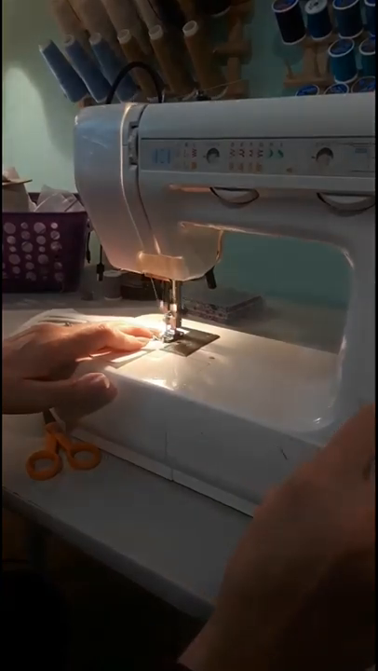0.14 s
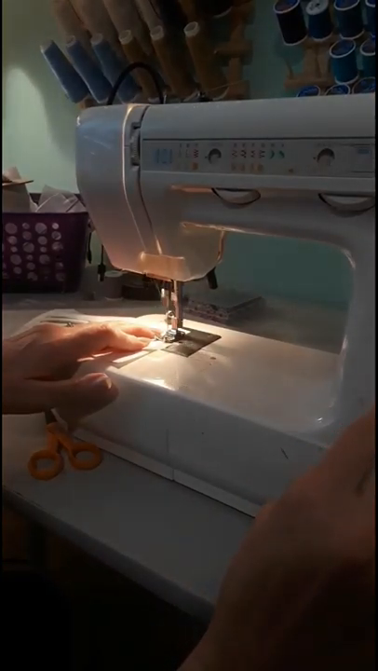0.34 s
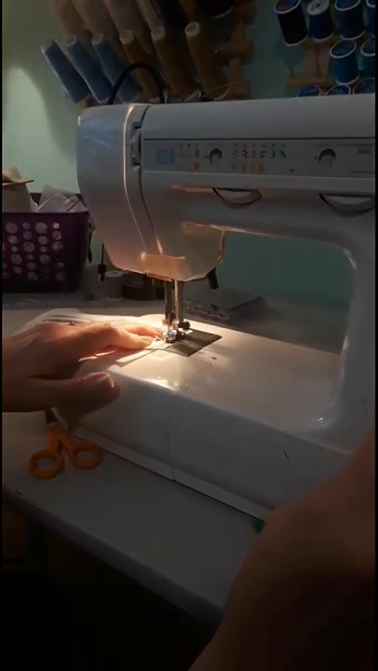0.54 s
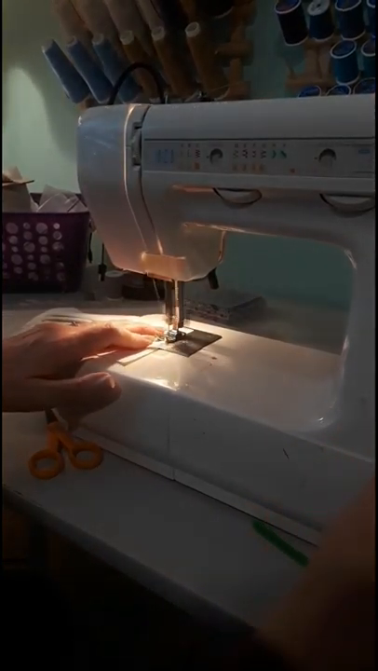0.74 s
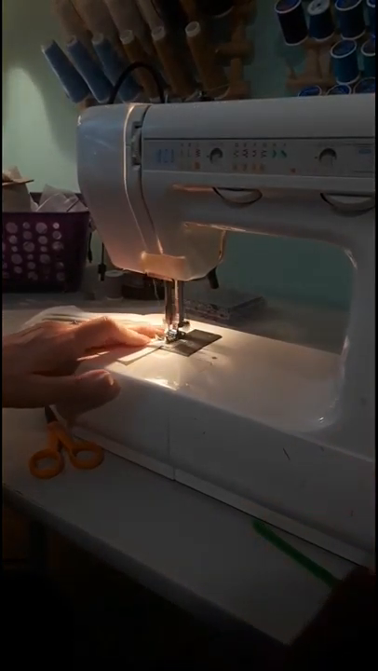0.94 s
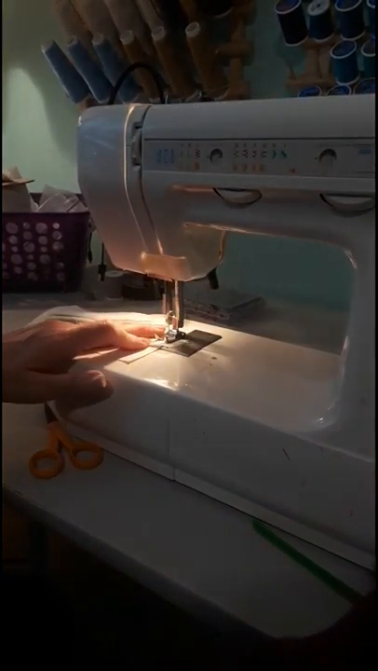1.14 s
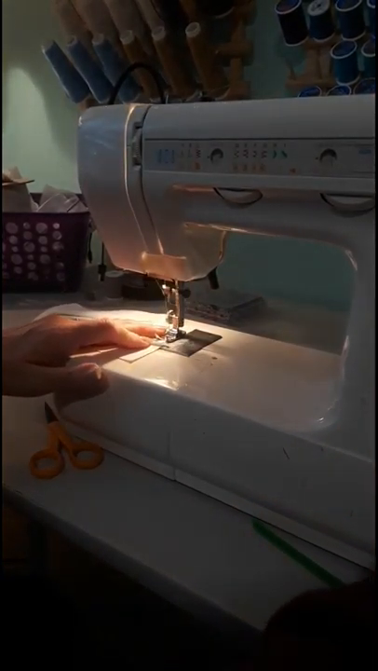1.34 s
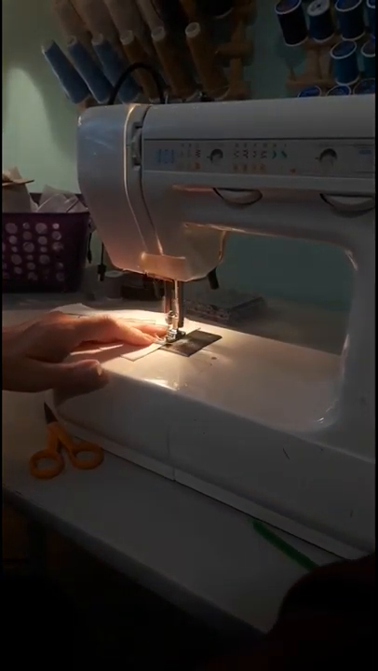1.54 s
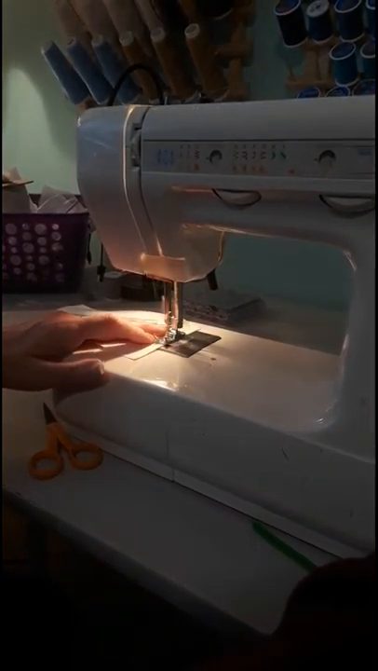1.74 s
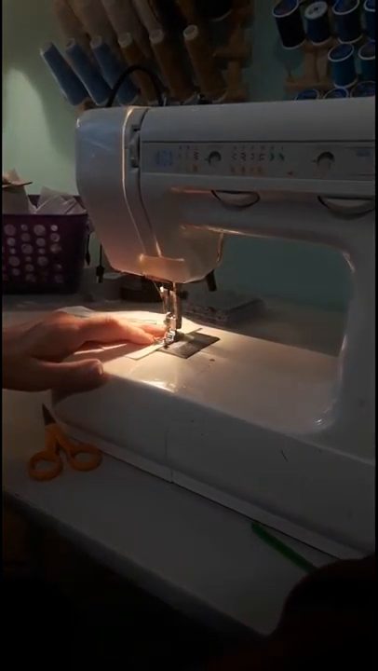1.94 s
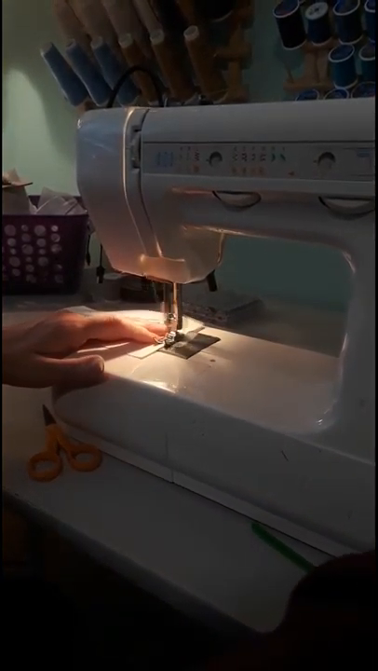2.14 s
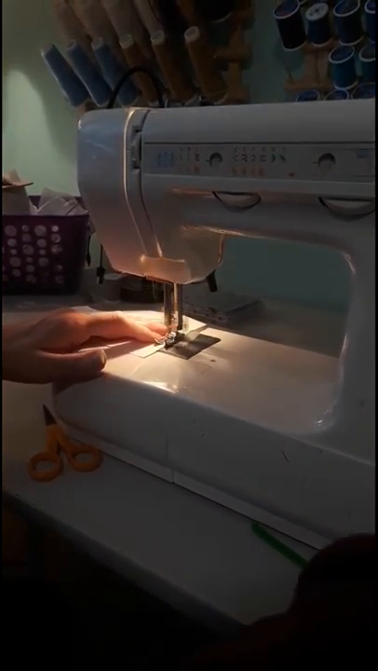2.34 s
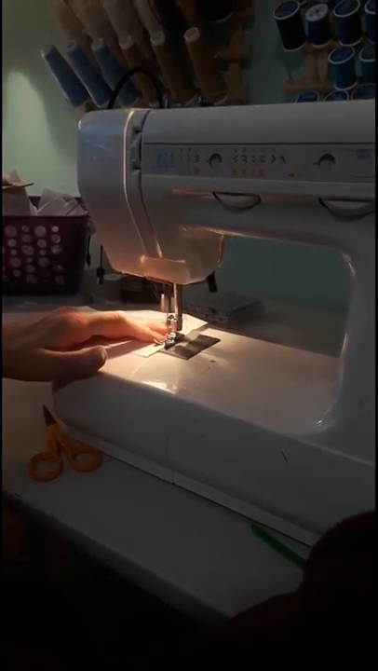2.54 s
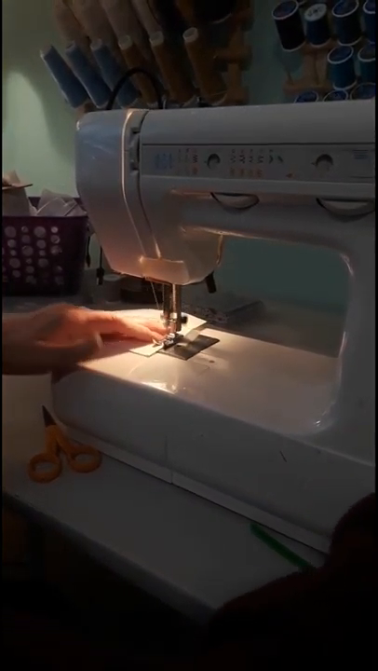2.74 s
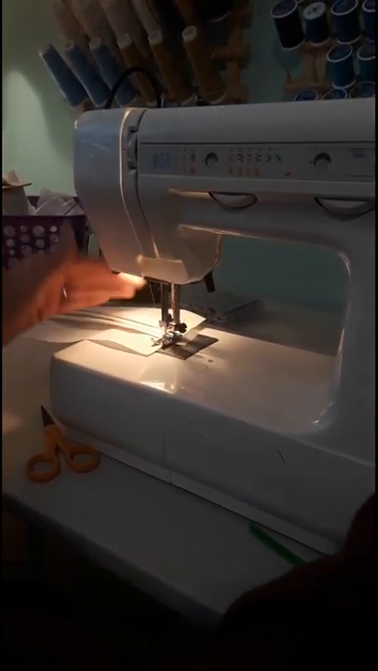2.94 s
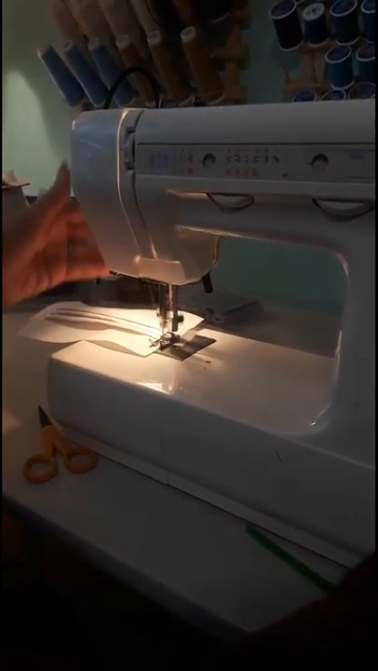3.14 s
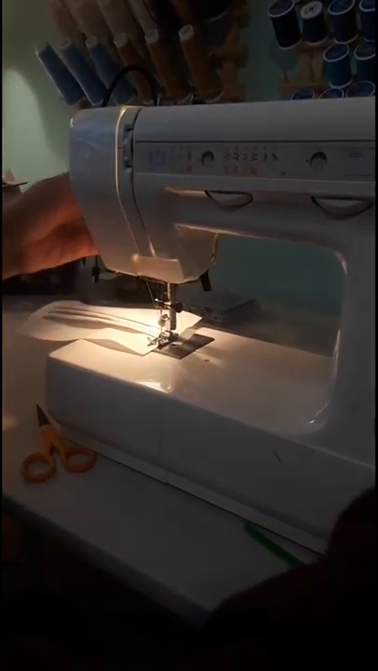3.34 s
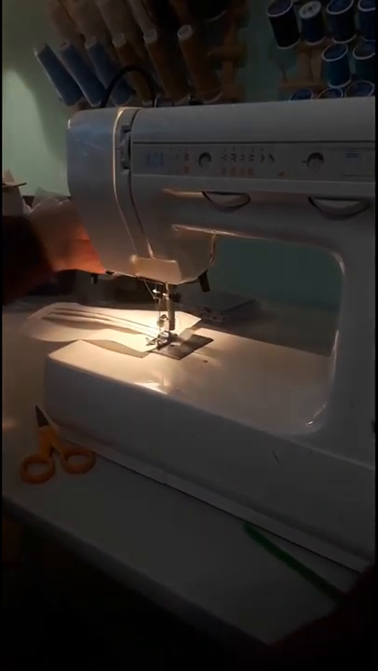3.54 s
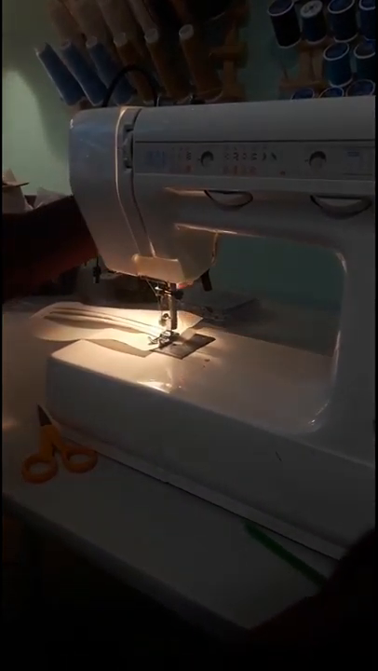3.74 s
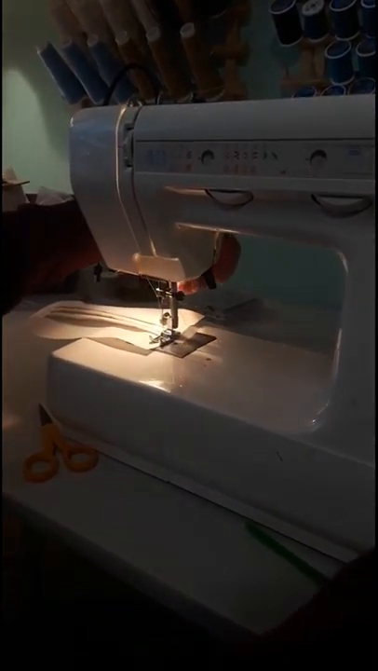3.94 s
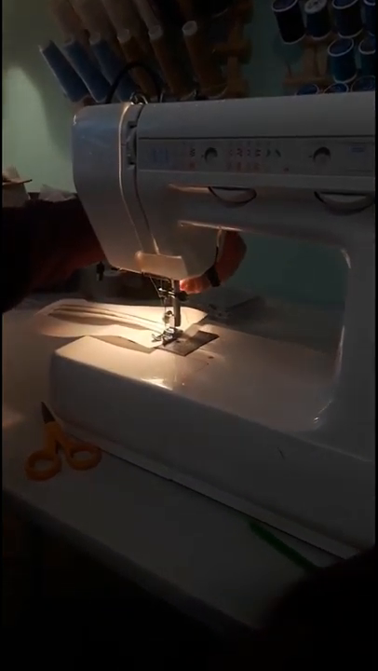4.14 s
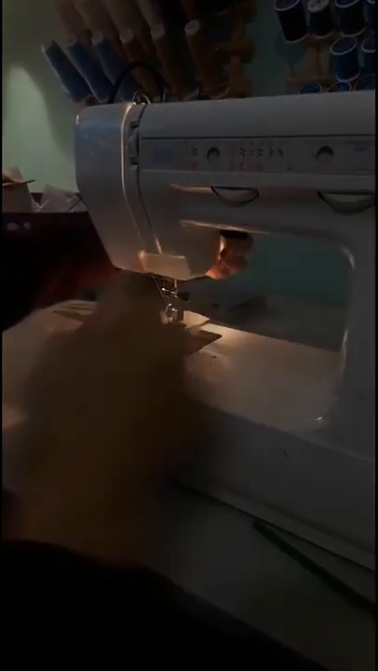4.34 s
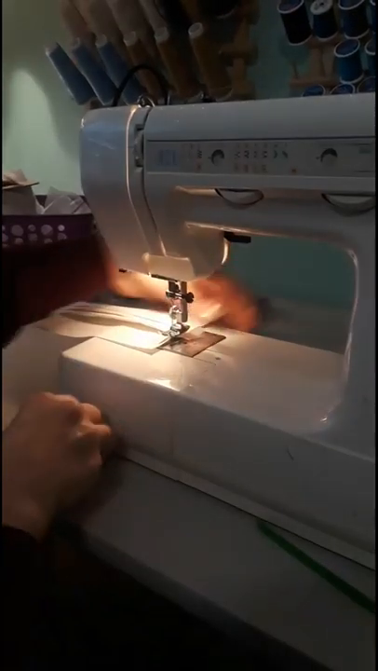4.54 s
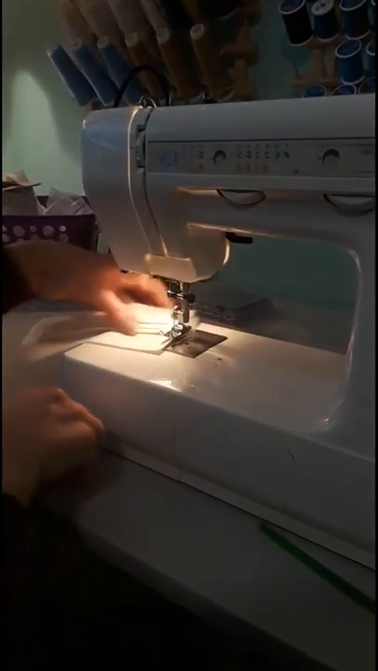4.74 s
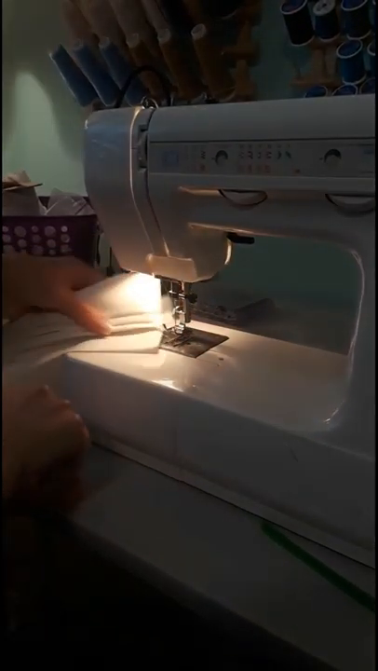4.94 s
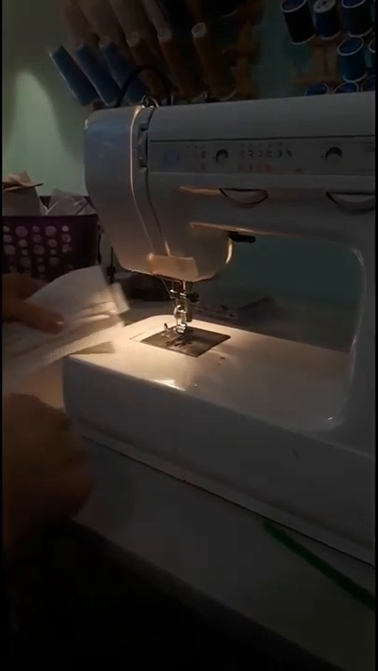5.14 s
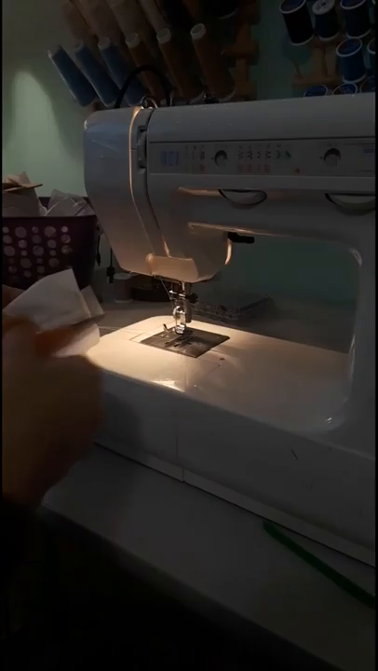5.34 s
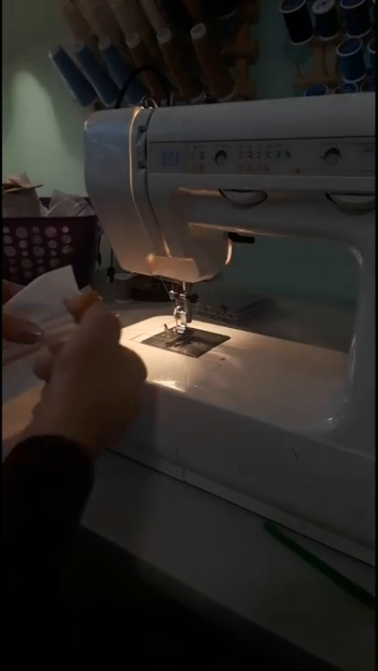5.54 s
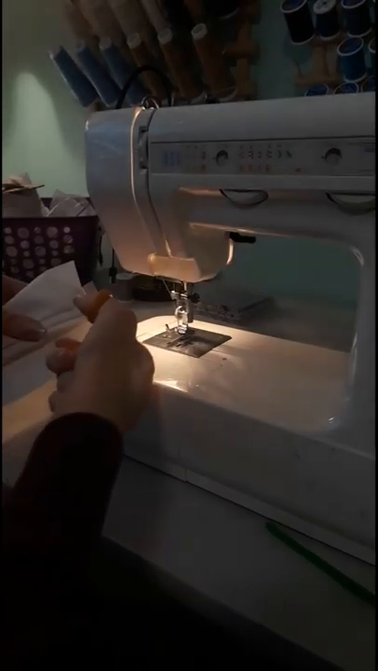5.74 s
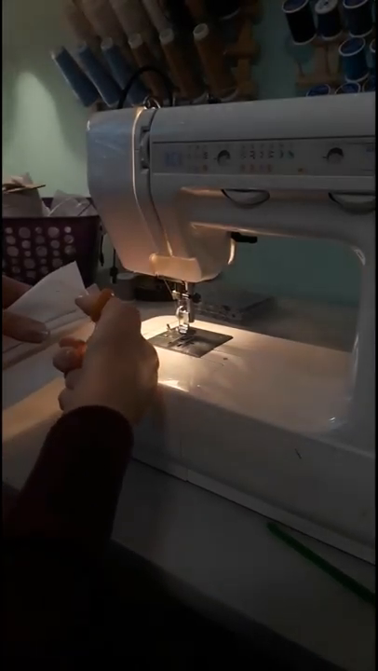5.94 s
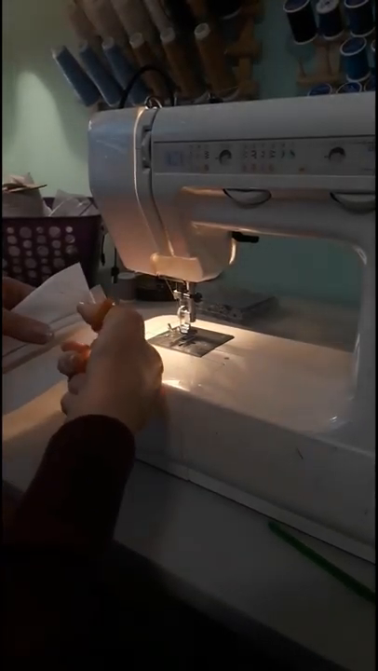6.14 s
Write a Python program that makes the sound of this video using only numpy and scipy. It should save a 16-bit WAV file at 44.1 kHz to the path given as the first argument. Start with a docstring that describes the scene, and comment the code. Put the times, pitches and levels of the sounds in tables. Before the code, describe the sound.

A close stereo pickup of an electric sewing machine indoors: slow first stitches quicken into a steady metallic chatter over a wavering motor whirr and fine hiss, then drag to a stop. Afterwards come scattered plastic and metal clicks, a hard snap that booms in the hollow case, soft hand brushing, and short gritty fabric slides, ending in faint steady room noise with a thin whine.

```python
"""A hand brushes the bed, then a sewing machine speeds up, sews a short seam and stops, in a small room.
While it runs the drive rattles and hisses, needle bar and feed clack in turn, and the hollow case thumps.
Then a hand works the levers, the presser foot snaps up, and the cloth is drawn away over a dull hum of air.
Rattle, rub and air are filtered noise, clacks and snaps are noise bursts, thumps are decaying sine modes."""
import sys
import numpy as np
from scipy import signal
from scipy.fft import rfft, irfft, next_fast_len
from scipy.io import wavfile

SR = 44100
rng = np.random.default_rng(int(sys.argv[2]) if len(sys.argv) > 2 else 0)


def unload_wav(signal):
    """Save mono or channel-first audio to the path in sys.argv[1] as 16-bit WAV at rate SR, clipped to [-1, 1]."""
    wavfile.write(
        sys.argv[1],
        SR,
        np.round(np.clip(np.atleast_2d(signal).T, -1, 1) * 32767).astype(np.int16),
    )


N = 272971
TIME = np.arange(N) / SR
HZ = np.fft.rfftfreq(8192, 1 / SR)  # frequency grid on which filters are drawn

# spectra of the drive's layers, shape only: f/Hz, level/dB
DRONE_SPECTRUM = [(40, -48), (75, -20), (120, -15), (190, -7), (260, -3.5), (330, 0.5), (380, 2.5),
                  (470, -3.5), (600, -11), (900, -47.5)]
RATTLE_SPECTRUM = [(250, -26), (450, -31), (600, 1), (900, -8.5), (1300, -5.5), (1800, -8), (2600, -14),
                   (3500, -27.5), (5000, -43), (9000, -46.5)]
HISS_SPECTRUM = [(2350, -10.5), (4000, 2), (5070, -5), (5570, -2.5), (8120, -3.5), (9770, -11.5),
                 (12600, -2), (14800, -13), (15500, -8), (16000, -6)]
# resonances of the frame: f/Hz, width f/Hz, level/dB above the spectrum
FRAME_MODES = [(122.6, 30.6, 11.5), (230.4, 32, 7.5), (262.6, 28, 10), (337, 12, 8), (360.4, 27, 7),
               (419.3, 19.6, 9.5), (539.4, 51, 10.5), (600, 35, 0), (693, 42, -1), (775, 75, 10.5),
               (986, 56, 5), (1026, 68, 3.5), (1085, 50, 11.5), (1270, 13, 5), (1434, 77, 7)]
# resonances of the steel parts: f/Hz, width f/Hz, level/dB above the spectrum
STEEL_MODES = [(2500, 120, 1), (2706, 100, 4), (3210, 380, 7.5), (3740, 60, 7), (3910, 49, 4.5),
               (4394, 56, 8), (4430, 91, 2.5), (4640, 37, 10), (4900, 86, 2.5), (5110, 70, 8),
               (5230, 60, 4)]
RATTLE_DB, DRONE_DB, HISS_DB = -35, -35, -48.5  # at full effort, before the load surges
DRONE_FOLLOWS, HISS_FOLLOWS = 0.74, 0.87  # dB gained per dB of effort
WHIRR_DB, WHIRR_HZ = -39.5, 386.1  # a wavering tone in the drone
WHIRR_WAVER, WAVER_S = 0.18, 0.07  # largest share the pitch strays, time per glide
THREAD_TAUT_S = 0.14  # the hiss comes in as the thread tightens


def drive():
    """Gears and links rattle in the frame, the case drones with a wavering tone, and thread and hook hiss."""
    effort = effort_gain()
    load = surge()
    drone = effort ** DRONE_FOLLOWS
    hiss = effort ** HISS_FOLLOWS * np.minimum(TIME / THREAD_TAUT_S, 1) ** 2

    low = colour(grains(per_s=200, spread_db=1.5, smooth_db=-0.5) * drone, DRONE_SPECTRUM, FRAME_MODES)
    mid = grains(per_s=320, spread_db=3, smooth_db=-0.5) * effort * load
    mid = colour(mid, RATTLE_SPECTRUM, FRAME_MODES + STEEL_MODES)
    top = colour(grains(per_s=320, spread_db=7.5, smooth_db=0.5) * hiss * load, HISS_SPECTRUM, STEEL_MODES)

    stray = np.interp(TIME / WAVER_S, np.arange(N), rng.uniform(-0.94, 1, N))
    pitch = WHIRR_HZ * (1 + WHIRR_WAVER * stray)
    whirr = grains(per_s=250, spread_db=4.5, smooth_db=-3.5) * drone
    whirr = resonate(resonate(whirr, pitch, width=27), pitch, width=31)
    whirr *= np.std(drone) / np.std(whirr)
    return gain_of(WHIRR_DB) * whirr + gain_of(DRONE_DB) * low + gain_of(RATTLE_DB) * mid + gain_of(HISS_DB) * top


# how hard the motor works: t/s, level/dB
EFFORT = [(0.0, -18), (0.1, -10), (0.19, -15.5), (0.26, -17.5), (0.37, -4.5), (0.5, -9), (0.78, -4.5),
          (1.11, 0), (1.39, -0.5), (2.2, -0.5), (2.58, -5), (2.74, -15), (2.86, -31)]


def effort_db(s):
    """Effort of the motor in dB at time s."""
    return np.interp(s, *np.transpose(EFFORT))


def effort_gain():
    """Effort of the motor as a gain curve, dying away after the last row of its table."""
    s = np.transpose(EFFORT)[0]
    outside = np.maximum(s[0] - TIME, 0) + np.maximum(TIME - s[-1], 0)
    return gain_of(effort_db(TIME)) * np.exp(-outside / 0.084)


# turning of the main shaft, hesitant at first, then even: t/s, stitches sewn [turns]
SHAFT_TURNS = [(0.171, 0), (0.372, 1), (0.53, 2), (0.628, 2.47), (0.7145, 3), (0.843, 3.47), (0.961, 4),
               (1.118, 5), (1.272, 6), (2.172, 12), (2.485, 14), (2.652, 15), (2.748, 15.5)]
# load on the links through one turn: place in the turn [0-1], level/dB
TURN_LOAD = [(0, 3), (0.2, 1.5), (0.4, 2.5), (0.45, -1), (0.56, 1.5), (0.72, 0), (0.86, -2), (1, 2)]


def surge():
    """Gain of rattle and hiss as the load changes through each turn of the shaft."""
    turns = np.interp(TIME, *np.transpose(SHAFT_TURNS))
    return gain_of(np.interp(turns % 1, *np.transpose(TURN_LOAD)))


# contacts in every stitch (needle bar twice, hook, feed four times, take-up lever), before trims:
# place in the turn [0-1], steel ring level/dB, fine tick level/dB, clatter level/dB, decay t/s
STITCH_CONTACTS = [(0, -29.5, -45, -30, 0.0065), (0.058, -30, -40, -32, 0.0059),
                   (0.226, -40, -54, -35.5, 0.0069), (0.45, -46, -51, -37, 0.011),
                   (0.485, -32, -46, -29.5, 0.0077), (0.549, -41.5, -56, -30, 0.0051),
                   (0.61, -40, -60, -35, 0.0049), (0.945, -36.5, -53, -41.5, 0.0051)]
# spectra of ring, tick and clatter, shape only: f/Hz, level/dB
RING_SPECTRUM = [(1200, -19), (2500, 12.5), (3300, 9.5), (4800, 10.5), (6000, 7), (8000, -1), (10000, -17),
                 (16000, -38)]
TICK_SPECTRUM = [(5000, -19), (8000, -1.5), (10000, 0.5), (12800, 3), (15000, 0.5), (16000, -5)]
CLATTER_SPECTRUM = [(300, -48), (650, 10), (1000, -2.5), (1900, 4.5), (2600, -3), (3500, -16),
                    (6000, -60.5)]
# how hard the needle bar lands, one row per stitch: steel ring level/dB, fine tick level/dB
NEEDLE_ACCENTS = [(-5, -1), (-7, -3), (0, 4.5), (-0.5, -2.5), (2, 3), (1.5, 1), (2, 3), (2.5, 0.5),
                  (-2, 0.5), (-2.5, 0.5), (-3, -1), (-6, -0.5), (-4, -0.5), (1, 1.5), (-2, -6), (0.5, -5)]
RING_FOLLOWS = 0.54  # the steel rings less at low effort: extra dB per dB of stroke
PART_DETUNE, PART_SCATTER_DB = .02, 4.5  # the steel rings a little differently from stroke to stroke


def clacks(count=4):
    """Once a stitch, needle bar and feed take up their slack, chatter and ring the steel."""
    rows = []
    for place, ring, tick, clatter, decay in STITCH_CONTACTS:
        for s, db in zip(*strokes(place)):
            rows.append((s, ring + db * (1 + RING_FOLLOWS), tick + db, clatter + db, decay))
    accents = np.zeros((len(rows), 5))
    # the needle bar's two contacts come first
    accents[:2 * len(NEEDLE_ACCENTS), 1:3] = np.tile(NEEDLE_ACCENTS, (2, 1))
    s, ring_db, tick_db, clatter_db, decay_s = np.transpose(rows + accents)

    # strokes fall at random into groups, each with its own tuning of the steel
    ring, way = 0, rng.integers(0, count, len(s))
    for k in range(count):
        steel = []
        for f, w, db in STEEL_MODES:
            detuned = f * (1 + PART_DETUNE * rng.uniform(-0.63, 1))
            steel.append((detuned, w, db + PART_SCATTER_DB * rng.standard_normal()))
        # every group takes its decays from the top of the list, so they are mostly the needle bar's
        hits = chatter(s[way == k], ring_db[way == k], decay_s, hit_s=0.0018)
        ring = ring + colour(hits, RING_SPECTRUM, steel)
    tick = colour(chatter(s, tick_db, decay_s, hit_s=0.0033), TICK_SPECTRUM)
    clatter = chatter(s, clatter_db, decay_s, hit_s=0.0036)
    clatter = colour(clatter, CLATTER_SPECTRUM, FRAME_MODES + STEEL_MODES)
    return gain_of(-8.5) * ring + gain_of(-4.0) * tick + gain_of(-2.5) * clatter


STROKE_FOLLOWS, STROKE_SCATTER_DB = 0.5, 1.85  # dB per dB of effort, random spread


def strokes(place):
    """When the shaft passes a place in its turn, and how strong (dB) each stroke is."""
    s, turns = np.transpose(SHAFT_TURNS)
    passes = np.arange(len(NEEDLE_ACCENTS)) + place
    times = np.interp(passes, turns, s)
    dbs = STROKE_FOLLOWS * effort_db(times) + STROKE_SCATTER_DB * rng.standard_normal(len(times))
    reached = passes <= turns[-1]
    return times[reached], dbs[reached]


CHATTER_GAP_S, CHATTER_SCATTER_DB = .003, 2.5  # a loose joint closes in a quick run of hits


def chatter(times, dbs, decays, hit_s, count=6):
    """Each contact is a run of separate sharp noise hits, dying away."""
    hits = np.zeros(N)
    gaps = rng.uniform(0.46, 1.5, (len(times), count))
    sizes = rng.standard_normal((len(times), count))
    for s, db, decay_s, gap, size in zip(times, dbs, decays, gaps, sizes):
        after = CHATTER_GAP_S * (np.cumsum(gap) - gap[0])
        share = (gain_of(CHATTER_SCATTER_DB * size) * np.exp(-after / decay_s)) ** 2
        energy = gain_of(db) ** 2 * decay_s / hit_s
        hits[np.round((s + after) * SR).astype(int)] += energy * share / share.sum()
    power = signal.lfilter([1], [1, -np.exp(-2 / (hit_s * SR))], hits + 1e-20)
    return paired(rng.standard_normal((2, N))) * np.sqrt(2 * power)


# modes of the hollow case, before each blow weights them: f/Hz, level/dB, time to fall 60 dB t/s
CASE_MODES = [(139.7, -21, 0.2), (229.7, -21.5, 0.36), (347, -7.5, 0.068), (365, -7, 0.11),
              (401.7, -19.5, 0.27), (443.7, 1.5, 0.054), (506, -15, .035), (547, -10.5, 0.049),
              (614, -4, 0.026), (775, -17, 0.092), (940, -7.5, 0.027), (988, -25.5, 0.11),
              (1053, -10.5, 0.023), (1145, -29, 0.046), (1440, -25, 0.056), (1925, -36, 0.069),
              (2300, -31, .07)]


def knocks():
    """The case booms in decaying modes; hard blows wake its upper modes, heavy blows the lowest."""
    t, out = np.arange(SR // 4) / SR, np.zeros(N)
    hz, db, t60 = np.transpose(CASE_MODES)[:, :, None]
    sign = np.where(hz < 400, -1, 1)  # the two main modes start opposed, so the boom swells and beats
    onset = 1 - np.exp(-t / 0.0031)
    modes = sign * gain_of(db - 60 * t / t60) * np.sin(2 * np.pi * hz * t) * onset
    upper, lower = np.clip((hz - 450) / 150, 0, 1), np.clip((380 - hz) / 120, 0, 1)
    # a blow's lean favours one main mode or the other
    higher = np.clip((hz - 405) / 40, -1, 1) * (abs(hz - 405) < 100)
    for s, blow_db, hard_db, weight_db, lean_db in blows():
        wake_db = upper * (hard_db + 14.0) + lower * (weight_db + 15.5) + higher * lean_db
        add(out, s, gain_of(blow_db) * (modes * gain_of(wake_db)).sum(0))
    # the boom carries little deep bass below 100 Hz
    return gain_of(-4.5) * signal.sosfilt(signal.butter(2, 100, "high", fs=SR, output="sos"), out)


# the links knock the case in every turn, before stroke strength:
# place in the turn [0-1], level/dB, hardness level/dB, weight level/dB, lean level/dB
LINK_KNOCKS = [(0.239, -33.5, -3, -21, -1.5), (0.71, -28, -2.5, -21, -3), (0.9, -36.5, 4, -27, 6.5)]
# dull blows, from the labouring machine or the hand: t/s, level/dB, hardness level/dB,
# weight level/dB, lean to the higher main mode level/dB, time to the rebound t/s
DULL_BLOWS = [(0.222, -32, -9, -28, 3, .010), (0.274, -30, -32, -16, 0, .010),
              (0.371, -22.5, -13, -19, -8, .0105), (0.411, -23.5, -20, -30, -6.5, .011),
              (0.676, -21, -13.5, -11, -7, .010), (0.717, -25, -16, -19, 6, .010),
              (0.745, -29.5, -11, -34, -10, .0105), (0.82, -29, -13, -30, 9, .009),
              (0.8976, -15, -16, -31, 4, .0102), (0.988, -25.5, -15, -28, -2, .011),
              (1.094, -24.5, -15, -22, -5.5, .011), (1.223, -14, -20, -38, -2, .010),
              (1.417, -19, -12, -14.5, 0, .010), (1.757, -23.5, -19, -16, -8, .010),
              (2.067, -26, -21, -25, 3, .010), (2.309, -27, -21, -22, -7.5, .011),
              (2.368, -25.5, -12, -22, -6, .011), (2.447, -20.5, -9, -33, -6, .010),
              (2.491, -26, -9, -24, 0.5, .011), (2.539, -25, -11, -28, 5, .0095),
              (2.585, -22.5, -22, -21, 0.5, 0.0106), (2.642, -32, -21, -13, -9.5, .010),
              (2.958, -33, -19, -22, -2, .010), (3.093, -26, -12, -27, 1, 0.014),
              (3.142, -36, -13, -24, -5, 0.0052), (4.064, -41, -5.5, -8, 7.5, .010),
              (4.3615, -29, -2, -6, -3.5, .0105), (4.582, -40, 0, -1, -6.5, 0.0097),
              (4.785, -40.5, -9, 3.5, -2, 0.0098), (4.919, -38.5, 0.5, -10, -7.5, 0.014)]
REBOUND_DB = 1  # each dull blow lands twice
CLICK_HARD_DB, CLICK_WEIGHT_DB, CLICK_LEAN_DB = 1, -31.5, 2  # hardness where clatter equals boom
BOOM_LAG_S = 0.001


def blows():
    """All that strikes the case: s, dB, hardness, weight, lean. A snap with more clatter is a harder blow."""
    struck = []
    for place, knock, *tone in LINK_KNOCKS:
        struck += [(s, knock + db, *tone) for s, db in zip(*strokes(place))]
    for s, db, *tone, rebound_s in DULL_BLOWS:
        struck += [(s, db, *tone), (s + rebound_s, db + REBOUND_DB, *tone)]
    for s, _, _, clatter, boom in LEVER_SNAPS:
        hard = CLICK_HARD_DB + (clatter - boom) / 2
        struck.append((s + BOOM_LAG_S, boom, hard, CLICK_WEIGHT_DB, CLICK_LEAN_DB))
    return struck


# levers, presser foot and thread snapping, before trims:
# t/s, steel ring level/dB, fine tick level/dB, clatter level/dB, boom of the case level/dB
LEVER_SNAPS = [(0.193, -60, -61, -47, -42), (0.266, -54, -62, -51, -58), (0.334, -46, -46, -33.5, -50),
               (0.39, -40, -50, -39, -42), (0.564, -43, -51, -36.5, -40), (2.179, -46, -53, -48, -48),
               (2.503, -38, -41, -25.5, -43), (2.611, -48, -52, -27.5, -26), (2.695, -40.5, -52, -30, -37),
               (2.866, -53.5, -70, -43, -23), (3.174, -48, -52, -57, -62), (3.184, -54, -52, -39, -35),
               (3.2054, -35, -42.5, -28.5, -22.5), (3.2132, -52, -52, -29.5, -36),
               (3.228, -50, -60, -45, -30), (3.2832, -64, -67, -42, -54), (3.363, -50, -58, -43, -30.5),
               (3.518, -51, -65, -47, -55), (3.527, -53, -55, -41, -38), (3.5323, -44.5, -47, -35, -41),
               (3.543, -50, -55, -41, -45), (3.57, -55, -61, -46, -38), (3.613, -44.5, -48, -35, -29),
               (3.717, -63, -61, -49, -53), (3.7853, -36, -51, -31, -6), (3.861, -56, -61, -44, -34),
               (3.891, -46.5, -48, -40.5, -47), (4.021, -57, -75, -43, -36), (4.037, -54, -71, -44.5, -50),
               (4.362, -64, -70, -45, -24.5), (4.374, -60, -62, -46, -35), (4.704, -53, -48, -42, -40),
               (4.9572, -45, -44, -43, -51), (4.9755, -39.5, -50, -34.5, -33.5),
               (5.446, -63, -59, -66, -59)]
# bright spectrum of a snap, shape only: f/Hz, level/dB
SNAP_SPECTRUM = [(1200, 4.5), (2300, 3), (3300, 1), (4600, 5.5), (6200, 0), (8000, -3), (10000, -25),
                 (16000, -34)]
# resonances of the plastic head that carries the levers: f/Hz, width f/Hz, level/dB above the spectrum
HEAD_MODES = [(944, 60, 6), (1133, 62, 7), (1605, 50, 5.5), (1910, 34, -0.5), (2315, 53, 1)]


def clicks():
    """Small levers snap against the plastic head in bouncing bursts of noise."""
    s, ring_db, tick_db, clatter_db, _ = np.transpose(LEVER_SNAPS)
    ring = colour(bursts(s, ring_db, decay_s=0.005, bounce_s=0.009, bounce_db=-12.0), SNAP_SPECTRUM)
    tick = colour(bursts(s, tick_db, decay_s=0.0047, bounce_s=0.0063, bounce_db=-23), TICK_SPECTRUM)
    clatter = bursts(s, clatter_db, decay_s=0.0056, bounce_s=.0075, bounce_db=-5)
    clatter = colour(clatter, CLATTER_SPECTRUM, HEAD_MODES)
    # paired trims are left and right
    return gain_of([[1.5], [0.1]]) * ring + gain_of([[0.1], [-1.8]]) * tick + gain_of(0.2) * clatter


def bursts(times, dbs, decay_s, bounce_s, bounce_db):
    """Each contact chatters briefly, and the part bounces once."""
    t, power = np.arange(SR // 8) / SR, np.zeros(N)
    for s, db, late in zip(times, dbs, rng.uniform(0.96, 1.3, len(times))):
        shape = (gain_of(db) * np.exp(-t / decay_s)) ** 2
        add(power, s, shape)
        add(power, s + bounce_s * late, shape * gain_of(bounce_db) ** 2)
    return grains(per_s=4900, spread_db=-1.0, smooth_db=-14) * np.sqrt(power)


# spectra of the cloth's layers, shape only: f/Hz, level/dB
SLIP_SPECTRUM = [(40, -47), (120, -10), (230, 15.5), (450, 3.5), (620, 1), (850, -17), (1400, -15.5)]
RUB_SPECTRUM = [(300, -22.5), (560, 8.5), (720, 0), (840, 4), (1000, -2.5), (1650, -2.5), (2400, -10),
                (2750, -5.5), (3100, -17), (4500, -20), (8000, -31.5)]
CLOTH_HISS_SPECTRUM = [(1760, -3.5), (3000, -4), (4410, -8.5), (5600, -13), (7940, -6.5), (9330, -12.5),
                       (13300, -3), (15200, -20), (16000, -4)]
SCRAPE_DB, FIBRES_DB = -8.5, -18.5  # pitched scrape and crackling single fibres, on the rub's curve


def cloth():
    """Fingers and fabric catch and slip on the bed; drone and scrape shift in pitch as the cloth comes free."""
    start, _, length, *_, drone_hz, scrape_hz = np.transpose(HAND_STROKES)
    rub, drone, hiss = slide_levels()
    middle = start + length / 2
    pitch = np.interp(TIME, middle, drone_hz)
    scrape_pitch = np.interp(TIME, middle, scrape_hz)

    slips = colour(grains(per_s=400, spread_db=6, smooth_db=4), SLIP_SPECTRUM)
    low = evened(resonate(resonate(slips, pitch, width=100), pitch, width=540)) * drone
    mid = colour(grains(per_s=380, spread_db=3.5, smooth_db=0.0) * rub, RUB_SPECTRUM)
    scrape = resonate(grains(per_s=190, spread_db=3, smooth_db=-6.5), scrape_pitch, width=540)
    scrape = evened(resonate(scrape, scrape_pitch, width=740)) * rub
    top = colour(grains(per_s=240, spread_db=5.0, smooth_db=2) * hiss, CLOTH_HISS_SPECTRUM)
    fibres = colour(grains(per_s=180, spread_db=5.5, smooth_db=-10) * rub, SNAP_SPECTRUM)

    body = gain_of(1.0) * low + gain_of(-1.0) * mid + gain_of(2.0) * top
    return body + gain_of(SCRAPE_DB) * scrape + gain_of(FIBRES_DB) * fibres


# strokes of hand and cloth over the bed, before trims: start t/s, swell t/s, length t/s,
# rub level/dB, drone level/dB, hiss level/dB, drone f/Hz, scrape f/Hz
HAND_STROKES = [(0.034, 0.058, 0.15, -45.5, -50, -73, 365, 1480),
                (3.02, 0.085, 0.21, -49.5, -48.5, -66.5, 376, 1470),
                (3.411, 0.027, 0.071, -50.5, -46.5, -60.5, 393, 2370),
                (3.522, 0.021, 0.12, -52.5, -47.5, -69, 385, 1600),
                (3.871, 0.03, 0.053, -47, -50, -76, 380, 938),
                (3.995, 0.019, 0.16, -69, -57.5, -72, 402, 800),
                (4.222, 0.11, 0.15, -58.5, -57.5, -85, 332, 700),
                (4.356, 0.012, 0.02, -53.5, -50, -67.5, 290, 750),
                (4.562, 0.11, 0.1, -51.5, -49, -56, 307, 1550),
                (4.65, 0.045, 0.057, -43.5, -44.5, -62, 310, 2500),
                (4.765, 0.023, 0.088, -54, -51.5, -64, 315, 1620),
                (4.836, 0.054, 0.098, -49, -46, -59, 312, 795),
                (4.991, 0.022, 0.086, -51.5, -51, -63, 360, 1550),
                (5.08, 0.016, 0.04, -48.5, -45, -64.5, 440, 1790),
                (5.154, 0.011, 0.022, -47, -44.5, -59.5, 444, 2000),
                (5.202, 0.017, 0.03, -47, -48, -70, 415, 1640)]
SLIDE_RELEASE_S = 0.055
CATCH_DB, CATCH_S = 2.5, .018  # sliding is uneven: depth and length of each catch


def slide_levels():
    """Rub, drone and hiss gains: each stroke swells, holds unevenly and dies away."""
    power = np.zeros((3, N))
    for start, swell, length, *dbs, _, _ in HAND_STROKES:
        rise = np.clip((TIME - start) / swell, 0, 1)
        fall = np.exp(-np.maximum(TIME - start - length, 0) / SLIDE_RELEASE_S)
        power += np.outer(gain_of(dbs), rise * fall) ** 2
    catches = np.interp(TIME / CATCH_S, np.arange(N), rng.standard_normal(N))
    return np.sqrt(power) * gain_of(CATCH_DB * catches)


# the cloth snags as it is drawn out, before the final gain: t/s, level/dB, f/Hz
CLOTH_SNAGS = [(4.579, -51, 1410), (4.674, -50, 850), (4.692, -44.5, 2500), (5.029, -51, 1950),
               (5.046, -53, 1950), (5.168, -49.5, 747), (5.2, -47, 1750), (5.222, -47, 1630)]
# spectrum of a scratch before its resonance, shape only: f/Hz, level/dB
SNAG_SPECTRUM = [(200, -20), (600, -1.5), (3000, -3), (16000, -0.5)]
SNAG_DECAY_S = 0.018


def snags():
    """The cloth catches and lets go in short gritty scratches, each at its own pitch."""
    s, db, hz = np.transpose(CLOTH_SNAGS)
    scratches = colour(chatter(s, db, np.full(len(s), SNAG_DECAY_S), hit_s=.006), SNAG_SPECTRUM)
    pitch = np.interp(TIME, s, hz)
    return gain_of(12.5) * resonate(resonate(scratches, pitch, width=620), pitch, width=1300)


# decay of the room: f/Hz, time to fall 60 dB t/s
ROOM_DECAY = [(100, 0.75), (400, 0.56), (1000, 0.24), (3000, 0.28), (8000, 0.29), (16000, 0.41)]
# share of scattered and late sound: f/Hz, level/dB
ECHO_SHARE = [(100, -43), (400, -5.5), (900, 0.5), (3000, 3), (16000, 1)]
# nearby surfaces: delay left t/s, delay right t/s, level/dB
SURFACES = [(0.0023, 0.0022, -19), (0.0047, 0.003, -19), (0.0071, 0.007, -18), (0.0137, 0.0134, -16.5)]


def room(x, wet_db, early_db, early_s):
    """Reflections off table and wall, scatter off nearby things, then the short tail of the room."""
    hz, t, z = signal.stft(paired(rng.standard_normal((2, SR // 2))), SR, nperseg=256)
    late = gain_of(wet_db - 60 * t / read(ROOM_DECAY, hz)[:, None]) * (t > .012)
    early = gain_of(early_db) * np.exp(-t / early_s) * (t > 0)
    share = gain_of(read(ECHO_SHARE, hz))[:, None]
    response = signal.istft(z * (late + early) * share, SR, nperseg=256)[1]
    for left_s, right_s, db in SURFACES:
        response[[0, 1], [round(left_s * SR), round(right_s * SR)]] += gain_of(db)
    return x + signal.fftconvolve(x, response, axes=1)[:, :N]


# spectrum of the background, shape only: f/Hz, level/dB
AIR_SPECTRUM = [(25, -40), (50, -18), (90, 0.5), (130, 6), (190, -2.5), (240, 4.5), (400, -9.5), (650, -5),
                (980, -2.5), (1080, -12), (1850, -6), (2450, -12.5), (2800, -12.5), (3020, -25),
                (6000, -29), (16000, -29)]
# balance of the background, left minus right: f/Hz, level/dB
AIR_BALANCE = [(250, -1.5), (1000, -2.5), (1500, -10), (2500, -15), (3000, -15.5), (3400, 0.5), (16000, -1)]
AIR_DB = -58  # before the balance
WHINE_HZ, WHINE_DB = 1018, -71  # level is rms


def air():
    """Steady dull noise, mostly from the right, with a faint thin sine whine."""
    wash = gain_of(AIR_DB) * colour(paired(rng.standard_normal((2, N))), AIR_SPECTRUM)
    whine = gain_of(WHINE_DB) * evened(np.sin(2 * np.pi * WHINE_HZ * TIME))
    return placed(wash, AIR_BALANCE) + whine


def gain_of(db):
    """Decibels to gain."""
    return 10 ** (np.asarray(db) / 20)


def evened(x):
    """Scaled to rms 1."""
    return x / np.sqrt(np.mean(x ** 2) + 1e-20)


def read(points, hz):
    """A table read on a log-frequency axis."""
    f, value = np.transpose(points)
    return np.interp(np.log(hz + 1), np.log(f + 1), value)


def add(mix, s, sound):
    """Mixes a sound in at time s."""
    part = mix[..., max(round(s * SR), 0):][..., :sound.shape[-1]]
    part += sound[..., :part.shape[-1]]


def grains(per_s, spread_db, smooth_db):
    """Tiny impacts of uneven size over a smooth rush."""
    size = gain_of(spread_db * np.minimum(rng.exponential(1, N), 3))
    size *= rng.random(N) < per_s / SR
    power = signal.lfilter([1], [1, -np.exp(-1 / (0.002 * SR))], size ** 2)
    level = np.sqrt(power / power.mean() + gain_of(smooth_db) ** 2)
    return evened(paired(rng.standard_normal((2, N))) * level)


def colour(x, points, peaks=()):
    """Causal (minimum-phase) filter of unit energy: a smooth spectrum with resonances on top."""
    db = read(points, HZ) + sum(h / (1 + (2 * (HZ - f) / w) ** 2) for f, w, h in peaks)
    log_gain = np.log(gain_of(np.r_[db, db[-2:0:-1]]))
    spectrum = np.exp(np.conj(signal.hilbert(log_gain)))
    response = np.fft.ifft(spectrum).real[:len(HZ)]
    return signal.oaconvolve(x, response[None] / np.linalg.norm(response), axes=1)[:, :N]


def resonate(x, hz, width):
    """A resonance that follows the curve hz: shift it to zero, smooth, shift back."""
    turn, r = np.exp(2j * np.pi * np.cumsum(hz) / SR), np.exp(-np.pi * width / SR)
    return 2 * (turn * signal.lfilter([1 - r], [1, -r], x / turn)).real


# likeness of left and right: f/Hz, correlation [-1 to 1]
STEREO_LIKENESS = [(30, -0.73), (120, 1), (400, 0.8), (750, 0.69), (1200, 0.013), (3000, 0.087),
                   (6000, -0.13), (16000, -0.25)]


def paired(x):
    """Two unrelated signals become a microphone pair whose likeness depends on frequency."""
    size = next_fast_len(x.shape[1])
    a, b = rfft(x, size)
    same = np.clip(read(STEREO_LIKENESS, np.fft.rfftfreq(size, 1 / SR)), -1, 1)
    mid, side = a * np.sqrt((1 + same) / 2), b * np.sqrt((1 - same) / 2)
    return irfft(np.array([mid + side, mid - side]), size)[:, :x.shape[1]]


def placed(x, balance):
    """Each pitch reaches the two microphones with its own balance."""
    size = next_fast_len(N)
    half_db = read(balance, np.fft.rfftfreq(size, 1 / SR)) / 2
    return irfft(rfft(x, size) * gain_of([half_db, -half_db]), size)[:, :N]


# balance of machine and hands, left minus right: f/Hz, level/dB
MACHINE_BALANCE = [(200, 1.5), (380, 1), (580, 6), (950, -1.5), (1300, 0), (1900, -2.5), (2900, -2),
                   (3700, 6.5), (5100, -4), (7400, 6), (10000, 1.5), (15000, 1.5)]


def scene():
    """Machine and hands close to the microphones, in the room, over the background air."""
    machine = drive() + clacks() + knocks() + clicks()
    hands = cloth() + snags()
    close = placed(machine + hands, MACHINE_BALANCE)
    return room(close, wet_db=-37.0, early_db=-28.0, early_s=0.0035) + air()


EDGE_HZ = 15800


def record(dry):
    """A steep low-pass sets the upper band limit."""
    low_pass = signal.firwin(511, EDGE_HZ, window=("kaiser", 9), fs=SR)
    return signal.oaconvolve(dry, low_pass[None], "same")


dry = scene()
out = record(dry)
unload_wav(out)
```